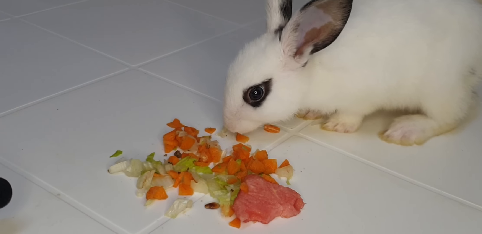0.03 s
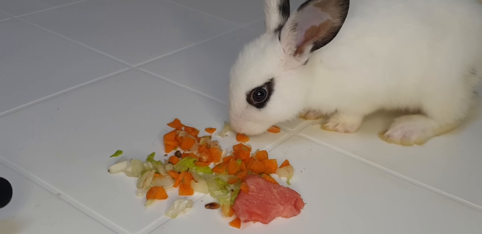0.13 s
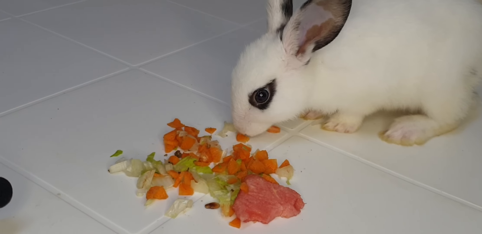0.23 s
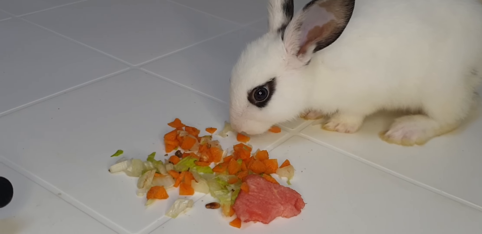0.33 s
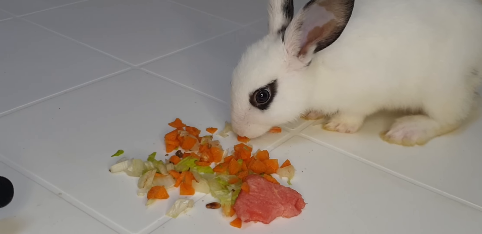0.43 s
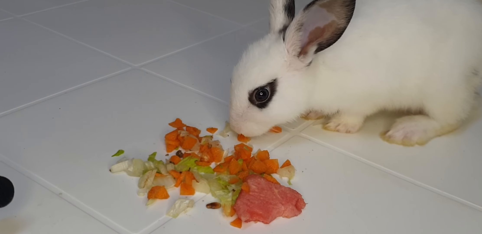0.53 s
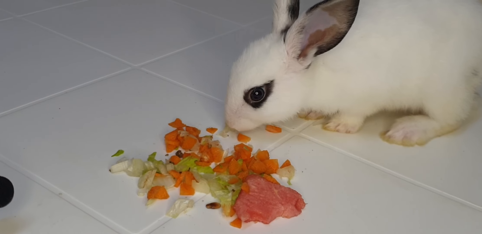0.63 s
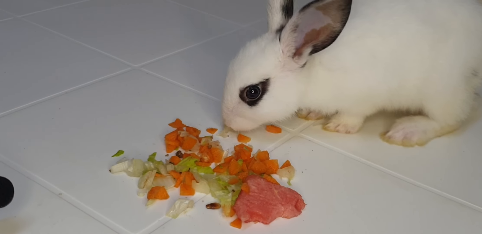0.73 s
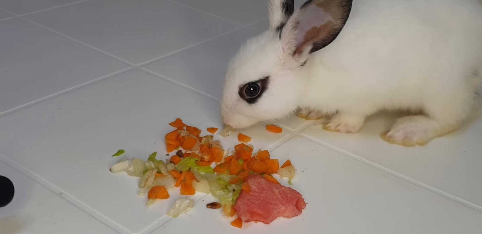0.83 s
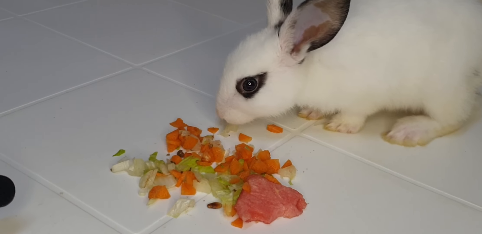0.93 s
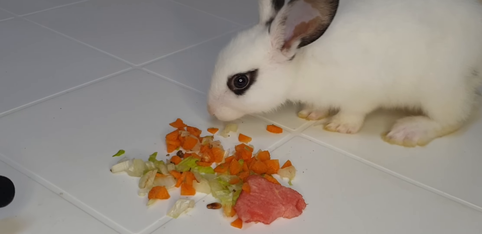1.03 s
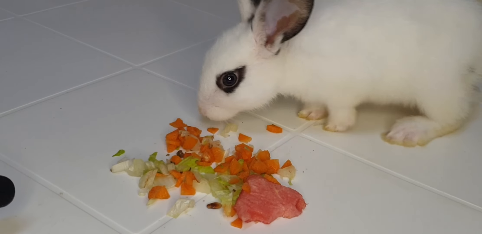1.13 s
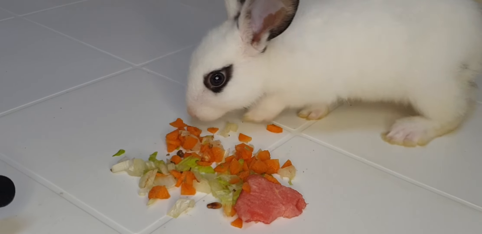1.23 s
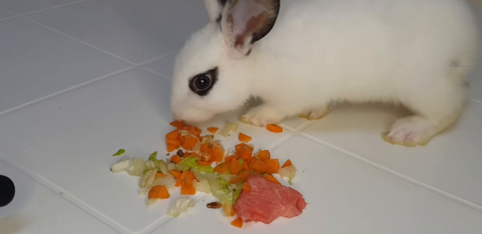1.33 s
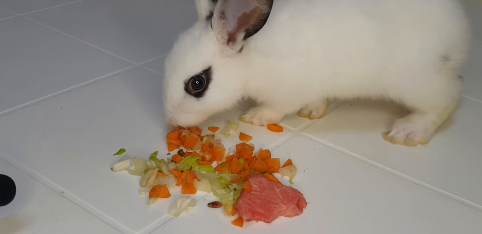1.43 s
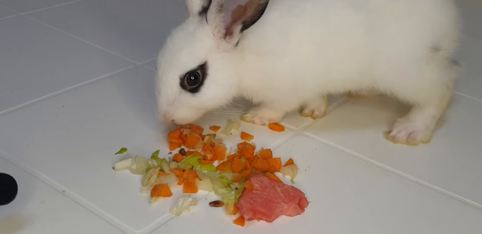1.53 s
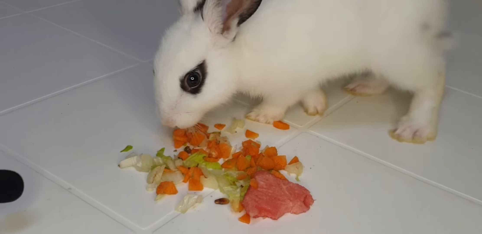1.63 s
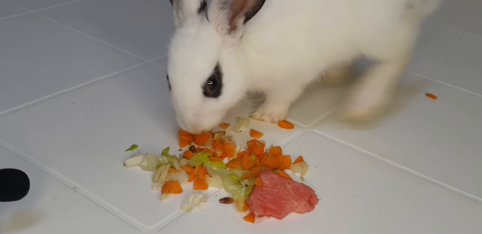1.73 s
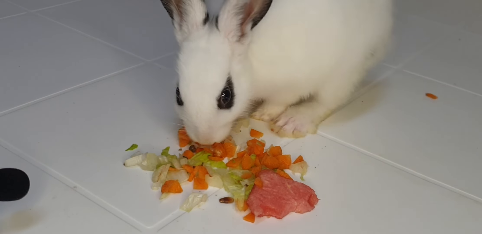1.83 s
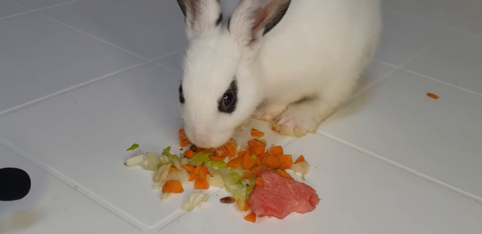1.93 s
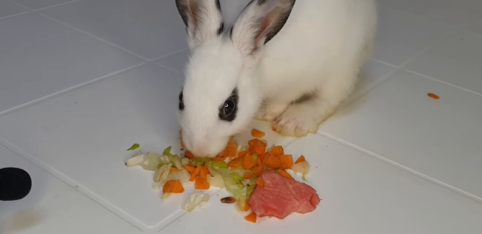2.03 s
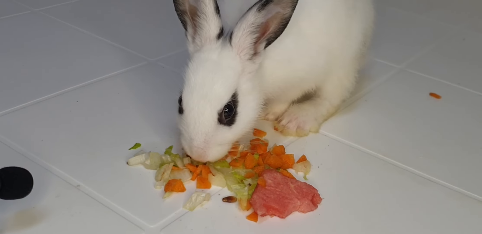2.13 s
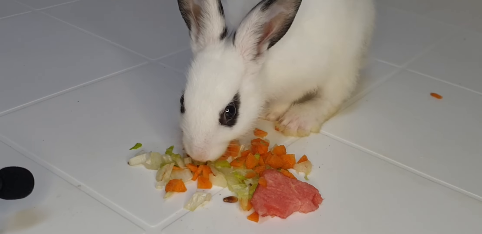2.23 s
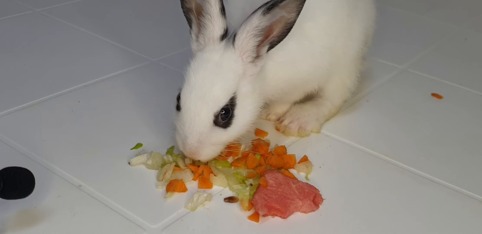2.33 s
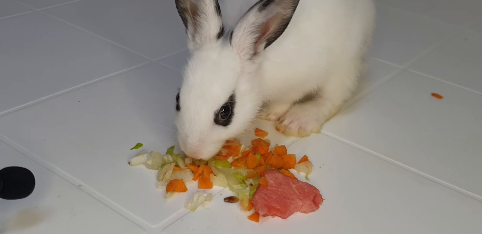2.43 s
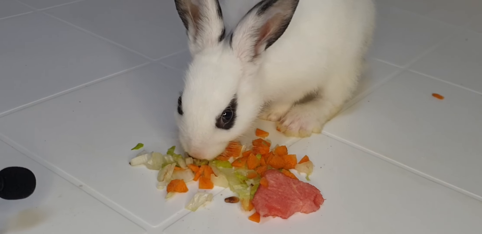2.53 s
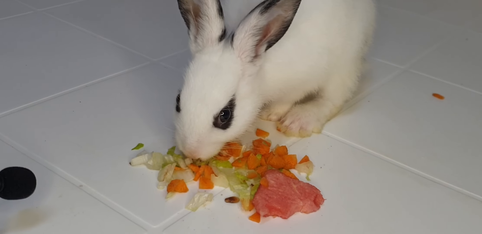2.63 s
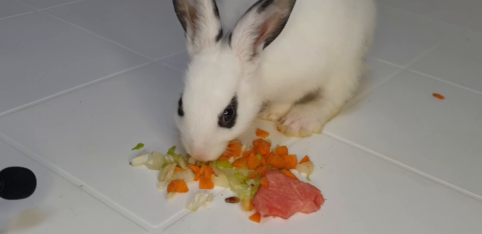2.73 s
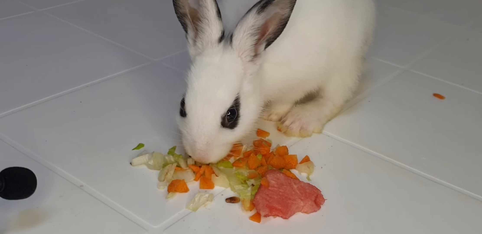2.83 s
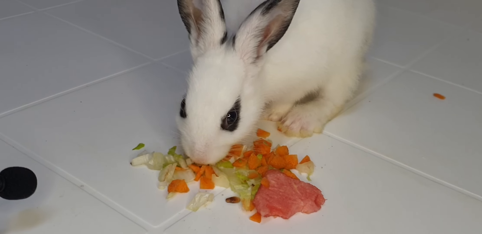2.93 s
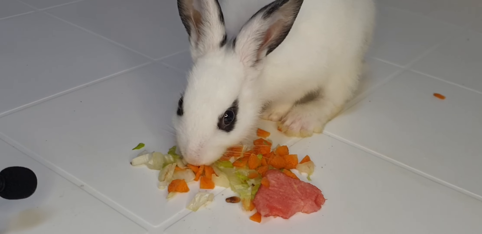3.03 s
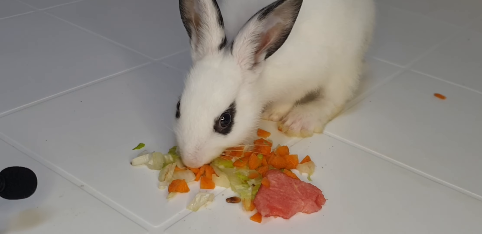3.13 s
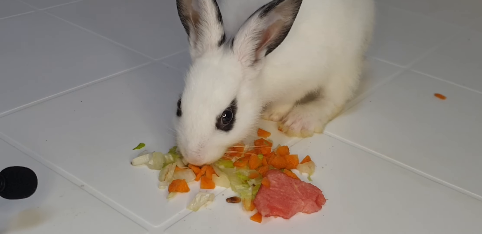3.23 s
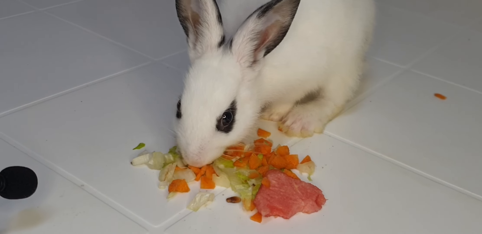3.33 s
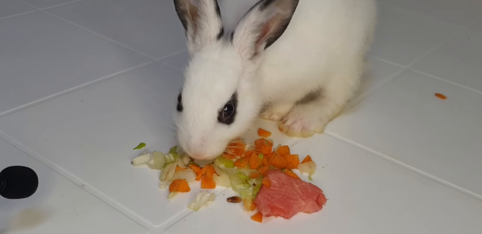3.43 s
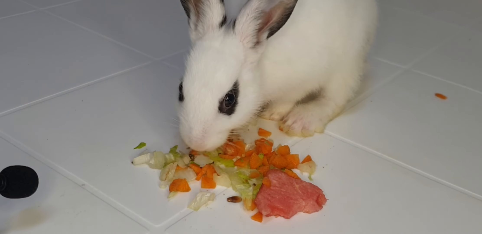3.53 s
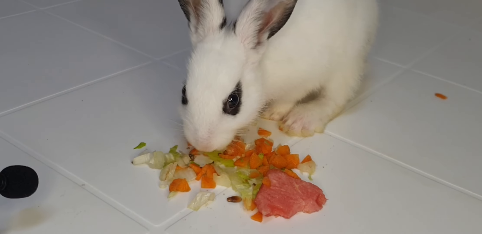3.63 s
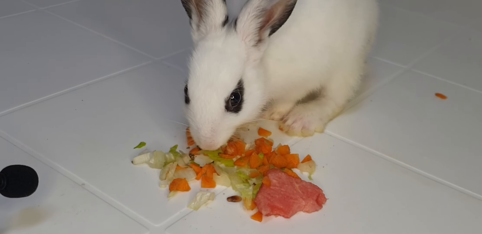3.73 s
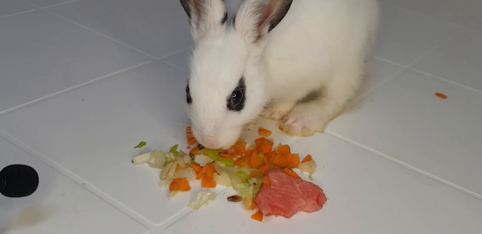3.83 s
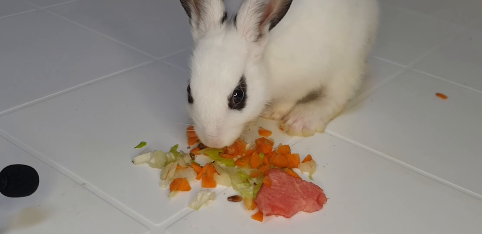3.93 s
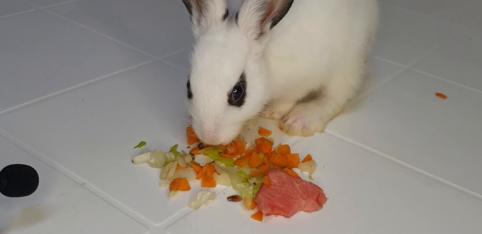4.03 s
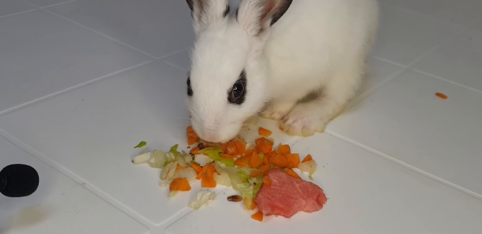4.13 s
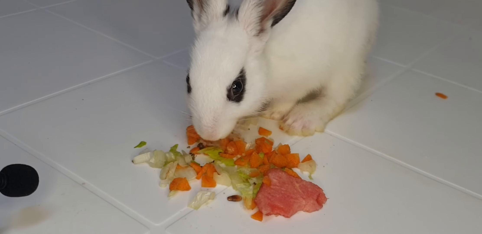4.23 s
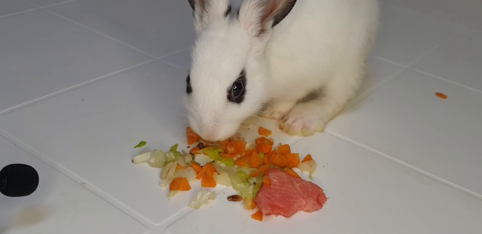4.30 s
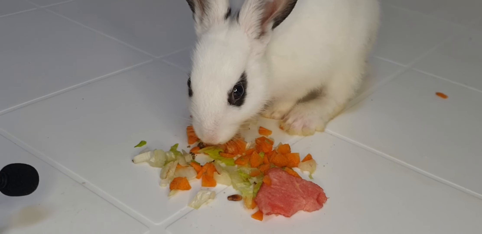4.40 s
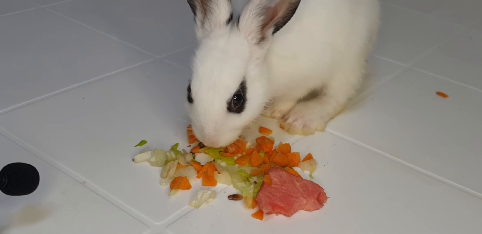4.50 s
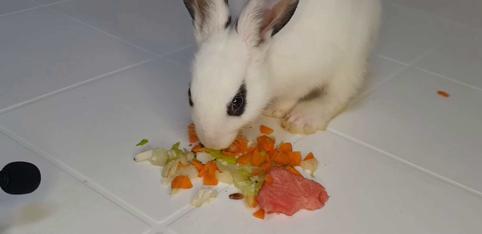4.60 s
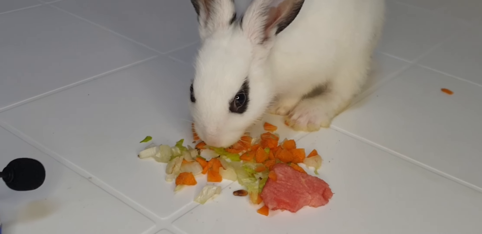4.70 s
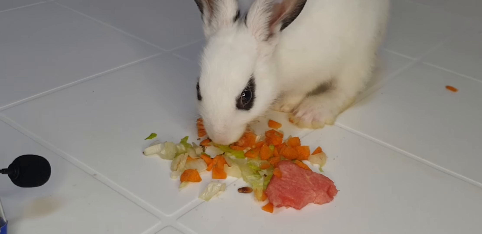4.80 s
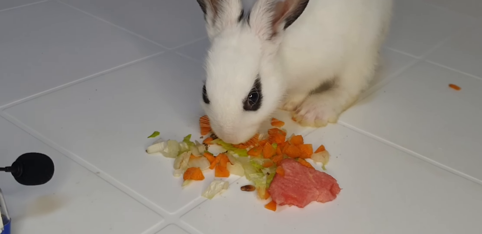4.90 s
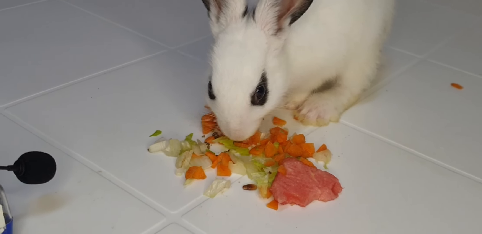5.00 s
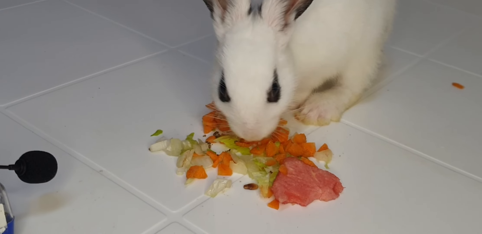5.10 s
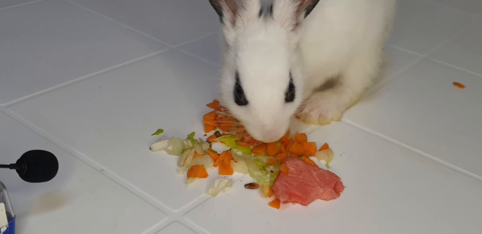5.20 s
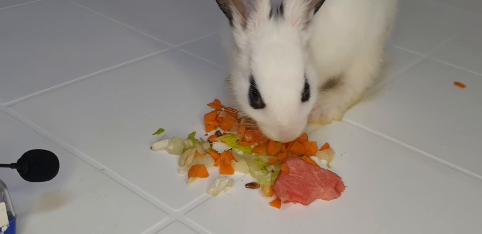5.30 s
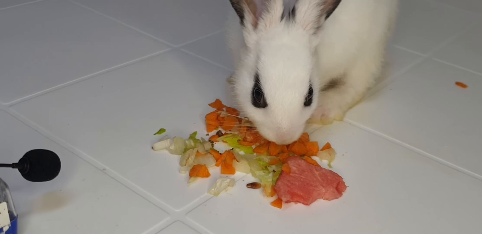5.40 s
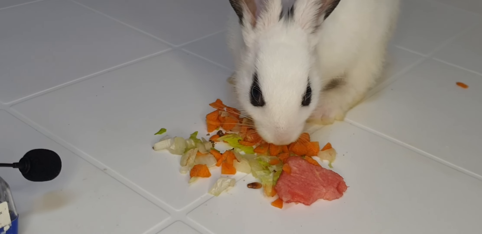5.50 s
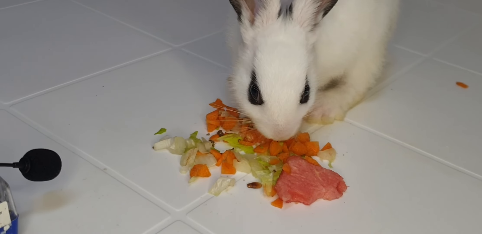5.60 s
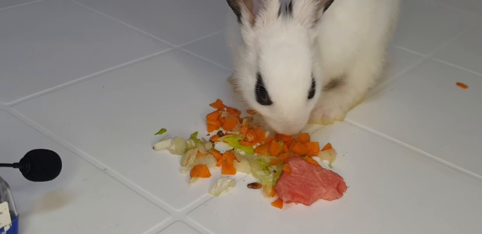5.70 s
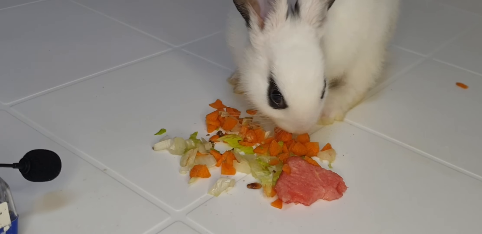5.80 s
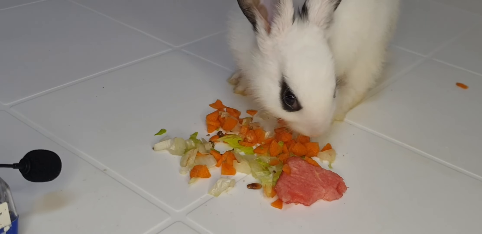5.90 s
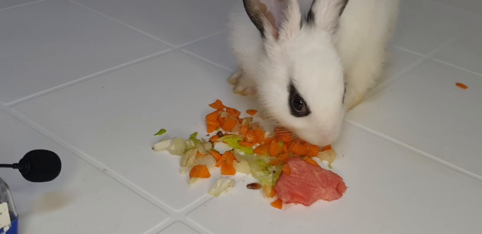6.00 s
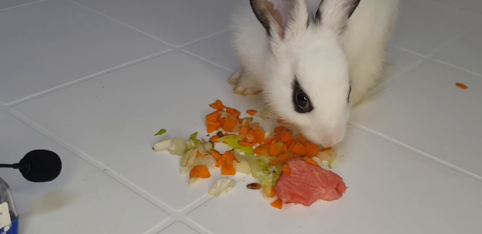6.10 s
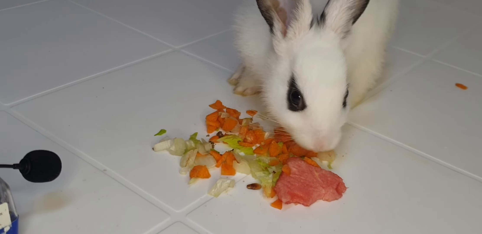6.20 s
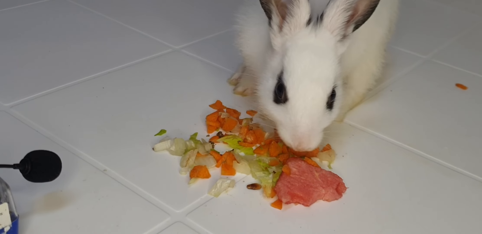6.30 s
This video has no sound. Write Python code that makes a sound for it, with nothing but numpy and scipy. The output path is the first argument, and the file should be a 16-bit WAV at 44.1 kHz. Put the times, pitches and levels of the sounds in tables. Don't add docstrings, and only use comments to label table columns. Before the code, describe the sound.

Quiet close rabbit chewing, dry ticking crunches, one paw scrape and deep booming landing on tile, then livelier crunching above faint hum and hiss.

```python
import sys
import numpy as np
from scipy import signal
from scipy.fft import rfft, irfft
from scipy.io import wavfile
from scipy.ndimage import uniform_filter1d

SR = 44100
rng = np.random.default_rng(int(sys.argv[2]) if len(sys.argv) > 2 else 0)


def inscribe(sig):
    pcm = np.round(np.clip(np.atleast_2d(sig).T, -1, 1) * 32767)
    wavfile.write(sys.argv[1], SR, pcm.astype(np.int16))


def makeup_ratio(level_db):
    decades = np.asarray(level_db, float) / 20
    return 10 ** decades


N = 280035


def level(x, db):
    return x * makeup_ratio(db) / np.sqrt(np.mean(x ** 2))


def colour(x, points):
    hz, db = np.transpose(points)
    f = np.maximum(np.fft.rfftfreq(len(x), 1 / SR), 1)
    gain = makeup_ratio(np.interp(np.log(f), np.log(hz), db, left=-90))
    return irfft(rfft(x) * gain, len(x))


def ring(x, hz, width):
    return signal.lfilter(*signal.iirpeak(hz, hz / width, SR), x)


def noise():
    return rng.standard_normal(N)


def walk(rate):
    k = int(SR / rate)
    steps = np.repeat(rng.standard_normal(N // k + 1), k)
    return 1.298 * uniform_filter1d(uniform_filter1d(steps, k), k)[:N]


def ticks(per_s, spread_db):
    hit = rng.random(N) < per_s / SR
    return level(hit * rng.standard_normal(N) * makeup_ratio(spread_db * rng.exponential(size=N)), 0)


def tone(hz):
    return np.sqrt(2) * np.sin(2 * np.pi * np.cumsum(hz) / SR)


# frequency in Hz, density in dB per Hz.
RUMBLE_SPECTRUM = [(15, -29.5), (25, -15.5), (49, -1), (71, 1), (88, -12), (119, -12.5), (275, -16),
                   (374, -18.5), (448, -22.5), (560, -28.5), (700, -50), (910, -73.5), (1540, -120)]
# frequency in Hz, width in Hz, rms level in dB.
RUMBLE_MODES = [(41.7, 6.3, -70), (126.1, 6.7, -78), (139.1, 7.3, -76), (151.5, 2.1, -79), (194, 6, -77.5),
                (228, 3.6, -82), (302.6, 5, -79.5), (330, 14, -86), (420.7, 5.7, -84.5), (466.9, 15, -82)]


def rumble():
    out = level(colour(noise(), RUMBLE_SPECTRUM), -61.5) * makeup_ratio(.8 * walk(5.4))
    for hz, width, db in RUMBLE_MODES:
        mode = ring(ring(noise(), hz, width), hz, 3 * width)
        out += level(mode, db) * makeup_ratio(.7 * walk(2.9))
    return out


# frequency in Hz, wander in Hz, level in dB, flutter in dB.
HUMS = [
    (55.6, 2.5, -61.5, 1),
    (75.66, 1.2, -66, 2.5),
    (260, 2.0, -79.5, 4),
]
# centre in seconds, level in dB, length in seconds.
HUM_SWELLS = [
    [(0.0, -55.5, 0.069), (0.95, -61.5, 0.17), (1.41, -56, .06), (3.0, -58.5, 0.14), (3.45, -59, .15),
     (3.88, -51, 0.021), (4.7, -62, 0.041), (5.2, -58.5, 0.39), (5.82, -59, 0.037), (6.2, -58.5, 0.11)],
    [(0.074, -65, .04), (1.3, -63, .12), (1.7, -61.5, 0.13), (3.03, -59.5, 0.11), (3.88, -63, 0.4),
     (4.4, -58.5, 0.051), (4.7, -65, .05), (5.55, -62, 0.11), (5.83, -59, 0.04)],
    [(0.17, -72.5, 0.12), (0.88, -74, 0.042), (1.3, -71, 0.13), (1.62, -69.5, 0.11), (2.93, -62, 0.06),
     (3.3, -77.5, .08), (3.98, -74, 0.041), (4.4, -72.5, 0.072), (4.98, -68.5, 0.18), (5.72, -68.5, 0.026),
     (6.35, -73.5, 0.064)],
]


def hums():
    t, out = np.arange(N) / SR, np.zeros(N)
    for (hz, wander_hz, db, flutter_db), swells in zip(HUMS, HUM_SWELLS):
        power = makeup_ratio(2 * (db + flutter_db * walk(7.4)))
        for s, top_db, length in swells:
            power += makeup_ratio(2 * top_db) * np.exp(-((t - s) / length) ** 2)
        out += tone(hz + wander_hz * walk(8)) * np.sqrt(power)
    return out


# time in seconds, level in dB.
WHINE_LOAD = [
    (0.0, -92),
    (0.8, -84.5),
    (1.5, -84.5),
    (3.3, -88),
    (4.4, -83),
    (5.0, -90),
    (6.1, -83),
]


def whine():
    pitch = 1660 + 5.0 * walk(40)
    load_db = np.interp(np.arange(N) / SR, *np.transpose(WHINE_LOAD)) - 1.5
    return makeup_ratio(load_db + 3.1 * walk(20)) * (tone(pitch) + makeup_ratio(-24) * tone(2 * pitch))


# frequency in Hz, density in dB per Hz.
HISS_SPECTRUM = [(350, -3.5), (600, -2), (900, -3), (1300, -7.5), (1750, -3.5), (2100, -11.5),
                 (3100, -19.5), (5800, -19.5), (7100, -13.5), (8200, -11.5), (9800, -14), (10400, -20),
                 (13000, -21.5), (15600, -22)]


def hiss():
    return level(colour(noise(), HISS_SPECTRUM), -78.5) * makeup_ratio(0.44 * walk(11))


def stirring():
    t = np.arange(N) / SR
    still_db, stir_db, stir_s = -95, -6.5, .3
    shake_s, shake_db, rise_s, t60_s = 1.98, -73.5, .08, .9
    since = t - shake_s
    shake = makeup_ratio(2 * (shake_db - 60 * np.maximum(since, 0) / t60_s))
    power = makeup_ratio(2 * still_db) + shake * np.exp(-(np.minimum(since, 0) / rise_s) ** 2)
    for s, _, crunch_db, _ in CHEWS:
        settling = np.exp(-np.abs(t - s) / stir_s) * (t > s - .01) / 2
        power += makeup_ratio(2 * (crunch_db + stir_db)) * settling
    return np.sqrt(power)


# frequency in Hz, density in dB per Hz.
RUSTLE_SPECTRUM = [(4000, -24), (5500, -11.5), (6300, -2.5), (7500, 1), (9700, -4.5), (10400, -15),
                   (13000, -34)]


def rustle():
    return level(colour(ticks(9000, 1.1), RUSTLE_SPECTRUM), -9.5) * stirring()


# start in seconds, length in seconds, crunch in dB, jaw in dB.
CHEWS = [(0.094, 0.07, -72.5, -83), (0.296, 0.069, -77, -77.5), (0.501, 0.049, -76.5, -82),
         (0.696, 0.07, -83, -81), (0.88, 0.068, -84.5, -79.5), (1.07, 0.061, -85, -86),
         (1.284, 0.06, -85, -85), (1.472, 0.07, -88.5, -84), (2.107, 0.071, -75, -83),
         (2.324, 0.062, -82, -85), (2.565, 0.055, -80.5, -84), (2.809, 0.061, -79.5, -78.5),
         (3.016, 0.077, -91, -87), (3.154, 0.045, -78.5, -93), (3.203, 0.059, -83, -90),
         (3.256, 0.048, -79.5, -91), (3.44, 0.07, -77.5, -100), (3.972, 0.07, -77.5, -87),
         (4.331, 0.078, -75, -74), (4.507, 0.071, -73.5, -73), (4.701, 0.068, -73, -75.5),
         (4.882, 0.065, -72.5, -68.5), (5.07, 0.068, -73, -75), (5.241, 0.084, -78, -75.5),
         (5.445, 0.068, -76.5, -74), (5.607, 0.11, -76.5, -73.5), (5.804, 0.097, -72.5, -72),
         (5.995, 0.1, -76, -77), (6.187, 0.1, -76, -77)]
# start in seconds, length in seconds, scrape in dB, knock in dB.
SCUFFS = [
    (1.687, 0.09, -84.5, -90),
    (1.807, 0.024, -75, -96),
    (1.829, 0.027, -66, -80.5),
    (1.864, 0.126, -77, -81.5),
]
# time in seconds, brightness in dB.
FACING = [(0.1, 1.5), (0.75, -2), (1.5, -1), (1.7, 4), (1.95, 2.5), (2.3, -2.5), (2.9, 1), (3.15, 6),
          (4.05, 7), (4.3, 0), (5.5, -.5), (6.2, -3.5)]
# frequency in Hz, density in dB per Hz.
CRUNCH_SPECTRUM = [(2000, -39), (3500, -26.5), (4400, -20), (5200, -8), (6200, -0.5), (7200, 0.5),
                   (8200, -4.5), (9500, -3.5), (10300, -11.5), (11800, -24.5), (14000, -20.5)]
# frequency in Hz, width in Hz, level in dB.
SKULL_MODES = [(1053, 600, 8.5), (1460, 300, 5.5), (650, 250, 3), (2380, 530, -13)]
PEAK_PLACE = .53


def crushed_cells():
    t = np.arange(N) / SR
    tilt_db = np.interp(t, *np.transpose(FACING))
    for s, length, _, _ in CHEWS:
        tilt_db -= ((t - s) / length - .5) * (t > s) * (t < s + length)
    shared, cells = walk(70), 0
    for hz in np.arange(4000, 13000, 800):
        patch_db = 2.5 * shared + 2.4 * walk(45) + tilt_db * np.clip((hz - 7300) / 1300, -2.2, .4)
        cells = cells + ring(ring(ticks(1200, 2.2), hz, 1000), hz, 1700) * makeup_ratio(patch_db)
    return colour(level(cells, 0) + level(ticks(600, 1.5), -13.5), CRUNCH_SPECTRUM)


def skull_thud():
    out = np.zeros(N)
    for hz, width, db in SKULL_MODES:
        out += makeup_ratio(db + 2.0 * walk(30)) * ring(ring(ticks(4000, 1.5), hz, width), hz, 2 * width)
    return out


def chewing():
    t, out = np.arange(N) / SR, np.zeros(N)
    cells, skull = crushed_cells(), skull_thud()
    for s, length, crunch_db, jaw_db in CHEWS + SCUFFS:
        stroke = slice(int((s - .01) * SR), int((s + length + 0.058) * SR))
        along = (t[stroke] - s) / length
        meet = np.clip(along * length / 0.0034, 0, 1)
        let_go = np.clip((1 - along) * length / 0.0056, 0, 1)
        press = meet * let_go * (0.73 + 0.41 * np.exp(-((along - PEAK_PLACE) / 0.2) ** 2))
        thud = np.exp(-((along - PEAK_PLACE) / 0.5) ** 2)
        out[stroke] += press * level(cells[stroke], crunch_db)
        out[stroke] += thud * level(skull[stroke], jaw_db)
    return out


def burst(hz, rise):
    t = np.arange(512) / SR
    return np.sin(2 * np.pi * hz * t) * (t / rise) * np.exp(1 - t / rise)


# time in seconds, peak in dB, pitch in Hz.
SNAPS = [(1.702, -63, 8820), (0.1216, -53, 9710), (0.3217, -62, 6170), (0.5277, -64, 6470),
         (1.8082, -51, 8000), (1.8366, -51.5, 8800), (1.9485, -61, 7180), (2.1385, -59, 6010),
         (2.155, -58, 5520), (2.5845, -63, 6830), (2.8345, -63, 6830), (3.4685, -64, 7520),
         (3.929, -62, 8190), (3.9863, -63, 7800), (4.368, -57, 7050), (4.4204, -57, 9300),
         (4.4962, -64, 7040), (4.5146, -59, 8880), (4.5531, -61, 7240), (4.7396, -54, 7170),
         (4.8344, -61.5, 7490), (4.8589, -63, 7580), (4.8988, -61, 6890), (5.0833, -59, 6240),
         (5.2724, -58, 7880), (5.4625, -60, 6670), (5.66, -64, 6510), (5.8656, -58, 6480),
         (6.0711, -64, 6900), (6.2253, -63, 6250)]
# time in seconds, peak in dB, low pitch in Hz, high pitch in Hz.
CLAW = (3.042, -67, 1800, 4000)


def snaps():
    out, fibres = np.zeros((2, N))
    starts, _, crunch_db, jaw_db = np.transpose(sorted(CHEWS + SCUFFS))
    bite_hz = 7350 + 258 * np.interp(starts, *np.transpose(FACING))
    bites = list(zip(starts + 0.0073, crunch_db + 13.5, bite_hz))
    for s, db, hz in SNAPS + bites:
        knock_db = np.interp(s, starts, jaw_db) + 9.5
        fibres[int(s * SR):][:512] += makeup_ratio(db - 1.5) * burst(hz, .85 / hz)
        out[int(s * SR):][:512] += makeup_ratio(knock_db - 4.5) * burst(1500, .0005)
    s, db, low_hz, high_hz = CLAW
    out[int(s * SR):][:512] += makeup_ratio(db) * (burst(low_hz, .0012) + burst(high_hz, .00013))
    return out + signal.sosfilt(signal.butter(4, 4800, "high", fs=SR, output="sos"), fibres)


def tiles(x):
    t60_s, tail_db = .35, -6
    t = np.arange(SR // 2) / SR
    tail = rng.standard_normal(len(t)) * makeup_ratio(-60 * t / t60_s) * np.minimum(t / 0.0018, 1)
    return x + signal.fftconvolve(x, tail * makeup_ratio(tail_db) / np.sqrt(np.sum(tail ** 2)))[:N]


# time in seconds, push in dB, push length in seconds, slap in dB.
LANDINGS = [
    (1.831, -21, .0012, -57),
    (1.846, -24, .003, -66),
    (1.8838, 1, .003, -62),
]
# frequency in Hz, level in dB, T60 in seconds, sign at the
ROOM_MODES = [(40.9, -34.5, 0.598, -1), (47.2, -27.2, 0.192, 1), (56.2, -28.4, 0.8, 1),
              (65.5, -27.2, 0.77, -1), (75.2, -43.1, 1.12, 1), (83.7, -26.5, 0.175, -1),
              (118.1, -30.3, 0.2, -1), (120.9, -23.5, 0.057, -1), (125.5, -41, 1.0, 1),
              (138.8, -30.0, 0.227, 1), (151.3, -27.3, 0.175, 1), (180.6, -46, 0.8, 1),
              (226.0, -53, 0.8, 1), (267.5, -39.9, 0.048, 1), (289.2, -32.2, 0.213, 1),
              (307.2, -45.1, 0.128, -1), (355.3, -44.0, 0.128, -1), (399.8, -43.4, 0.4, -1),
              (334.6, -28.5, 0.17, 1), (216, -57, 0.25, -1), (155, -44.5, 0.054, 1), (460, -39, .12, 1)]


def thump():
    t = np.arange(int(1.5 * SR)) / SR
    modes = np.zeros(len(t))
    for hz, db, t60, sign in ROOM_MODES:
        modes += np.sign(sign) * makeup_ratio(db - 60 * t / t60) * np.sin(2 * np.pi * hz * t)
    wash = colour(rng.standard_normal(len(t)), [(70, -15.5), (130, -18), (300, -10.5), (450, -9.5),
                                                (700, -30), (1500, -44), (20000, -86.5)])
    wash = level(wash, -37.5) * makeup_ratio(-60 * t / 0.67) * np.minimum(t / 0.0079, 1)
    return modes + wash


def hop():
    slap_hz, slap_t60_s = 415, 0.1
    push, slap = np.zeros((2, N))
    for s, db, length, slap_db in LANDINGS:
        since = np.arange(N) / SR - s
        pad = np.sin(np.pi * np.clip(since / length + .5, 0, 1))
        push += makeup_ratio(db) * pad / pad.sum()
        slap += makeup_ratio(slap_db - 60 * np.abs(since) / slap_t60_s) * np.clip(since / 0.0038, 0, 1)
    fur = level(ring(ring(noise(), slap_hz, 320), slap_hz, 370), 0)
    return signal.fftconvolve(push, thump())[:N] + slap * fur


def scene():
    room = rumble() + hums() + whine() + hiss() + rustle()
    return (room + tiles(chewing() + snaps()) + hop())[None]


def band_limit(x):
    return signal.sosfilt(signal.butter(12, 15610, fs=SR, output="sos"), x)


def record(dry):
    top_cut = signal.ellip(8, .2, 60, 15700, fs=SR, output="sos")
    bass_cut = signal.butter(2, 30, "high", fs=SR, output="sos")
    mix = signal.sosfiltfilt(bass_cut, signal.sosfilt(top_cut, dry))
    return band_limit(mix)


dry = scene()
out = record(dry)
inscribe(out)
```